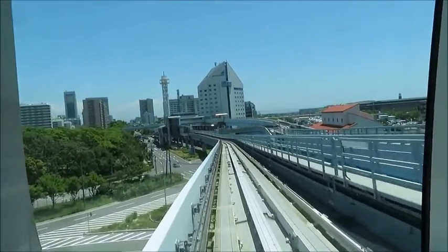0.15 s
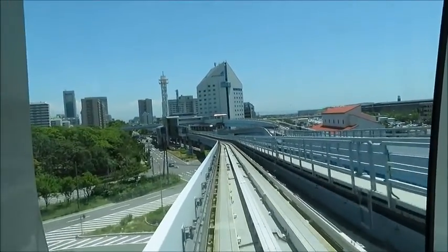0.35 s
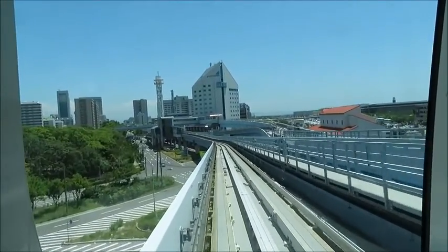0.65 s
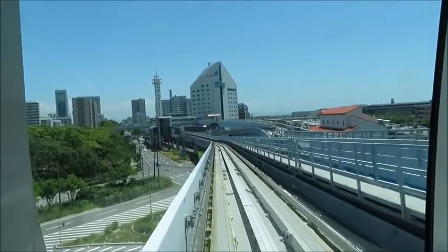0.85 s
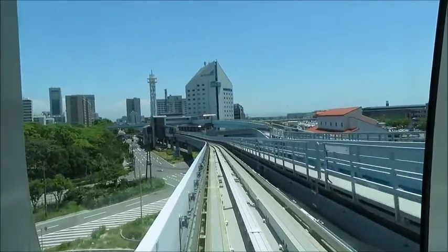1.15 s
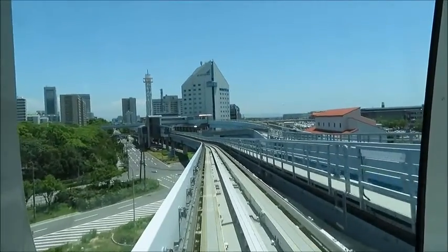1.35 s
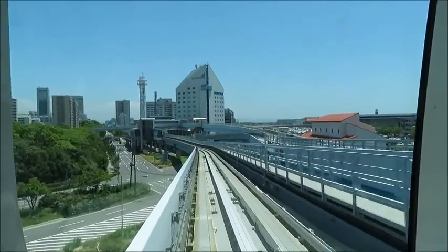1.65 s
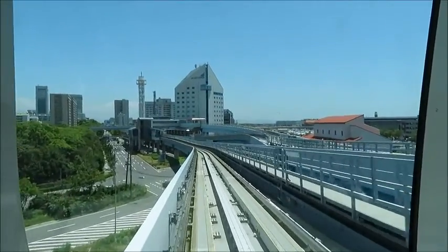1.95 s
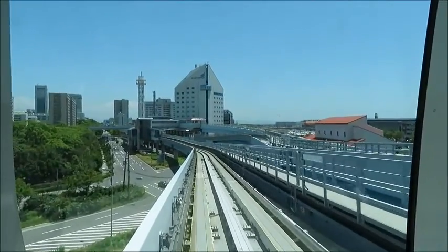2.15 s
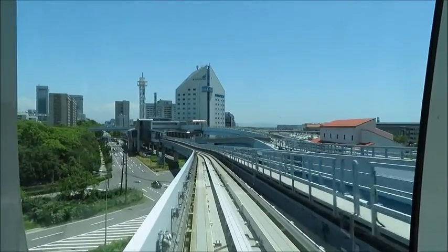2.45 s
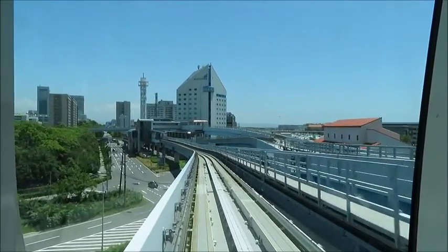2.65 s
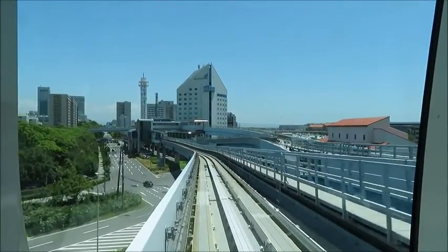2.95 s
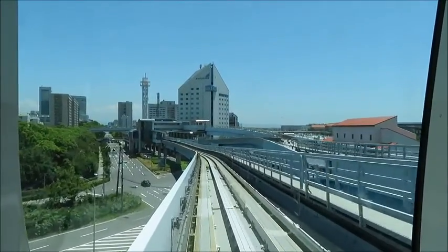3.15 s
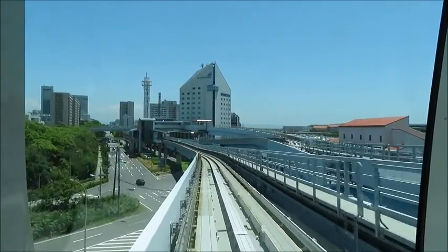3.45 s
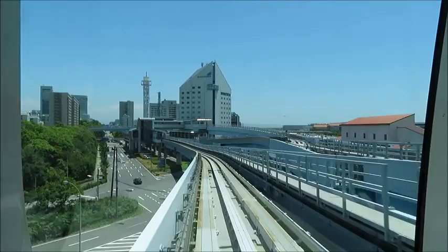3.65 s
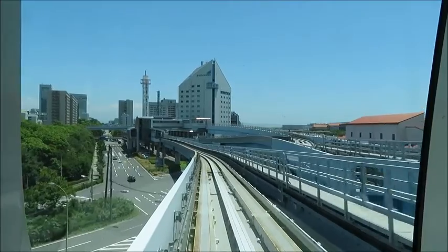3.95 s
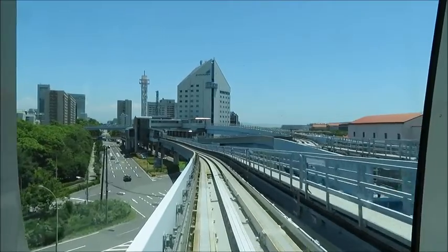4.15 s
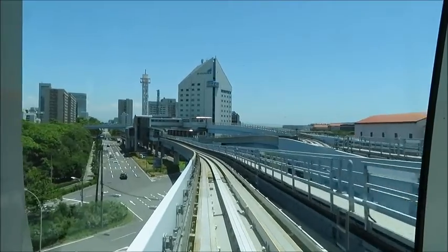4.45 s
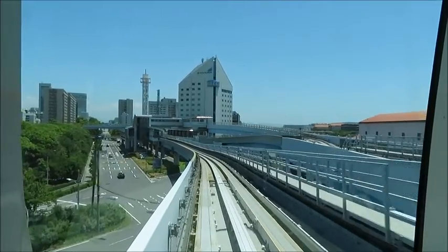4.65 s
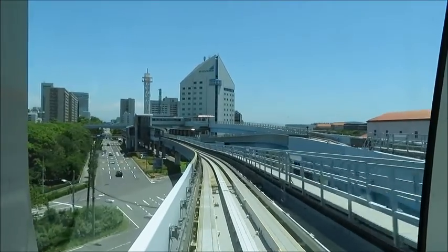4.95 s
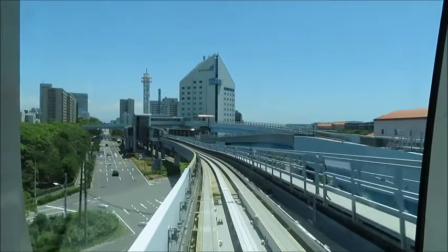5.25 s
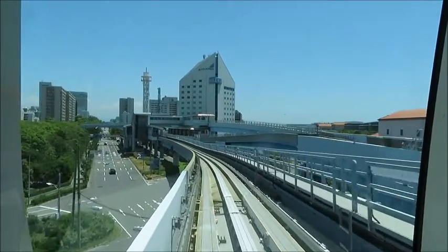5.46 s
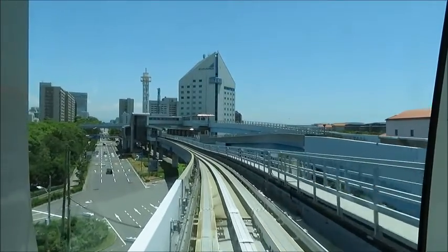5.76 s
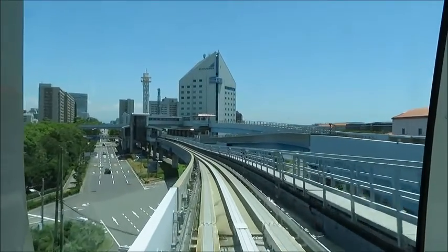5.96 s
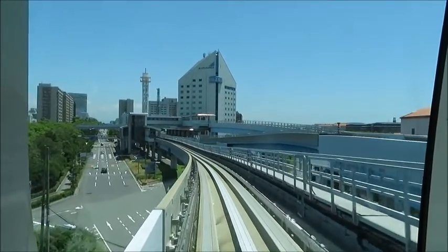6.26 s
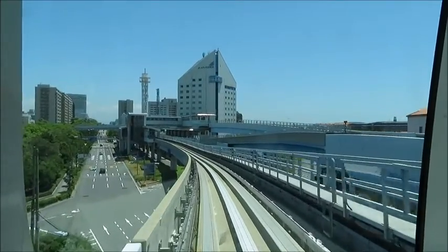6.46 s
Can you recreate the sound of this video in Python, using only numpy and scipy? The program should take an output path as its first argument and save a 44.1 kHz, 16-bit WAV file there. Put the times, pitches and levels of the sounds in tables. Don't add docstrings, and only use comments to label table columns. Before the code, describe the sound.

Inside a rubber-tyred train running on an elevated concrete guideway, a dark, continuous rolling roar fills the cabin. A low tread hum drops out and returns in quick bursts, rising very slightly in pitch. The floor booms over humps, deck joints thud softly, and a faint gear whine flickers. A small camera microphone inside hears everything nearly centred, close to mono.

```python
import sys
import numpy as np
from scipy import signal
from scipy.fft import rfft, irfft, next_fast_len
from scipy.io import wavfile
from scipy.ndimage import uniform_filter1d

SR = 44100
rng = np.random.default_rng(int(sys.argv[2]) if len(sys.argv) > 2 else 0)


def ratio(d):
    e = np.asarray(d, float) / 20
    return 10 ** e


def dump(signal):
    limited = np.clip(np.atleast_2d(signal).T, -1, 1)
    pcm = np.round(limited * 32767).astype(np.int16)
    wavfile.write(sys.argv[1], SR, pcm)


N = 291127
TIME = np.arange(N) / SR
COARSE = TIME[::64]


def curve(table):
    s, *columns = np.transpose(table)
    return [np.interp(TIME, s, column) for column in columns]


def on_log_axis(points, hz):
    at, db = np.transpose(points)
    return np.interp(np.log(hz), np.log(at), db)


def walk(rate):
    k = int(SR / rate)
    held = np.repeat(rng.standard_normal(N // k + 1), k)[:N]
    return 1.33 * uniform_filter1d(uniform_filter1d(held, k), k)


def tone(hz):
    return np.sqrt(2) * np.sin(2 * np.pi * np.cumsum(hz) / SR)


def hump(s, rise_s, fall_s):
    side_s = np.where(COARSE < s, rise_s, fall_s)
    return np.exp(-((COARSE - s) / side_s) ** 2)


def lifts(events, rise_s, fall_s):
    return np.interp(TIME, COARSE, sum(db * hump(s, rise_s, fall_s) for s, db in events))


def swells(events, rise_s, fall_s, rest_db):
    gain = ratio(rest_db) + sum(ratio(db) * hump(s, rise_s, fall_s) for s, db in events)
    return np.interp(TIME, COARSE, 20 * np.log10(gain))


def stretches(table, edge_s, rest_db):
    def edge(s):
        return 0.5 * np.tanh((COARSE - s) / edge_s)

    gain = ratio(rest_db) + sum(ratio(db) * (edge(s) - edge(s + length)) for s, length, db in table)
    return np.interp(TIME, COARSE, gain)


def draught():
    out = 0
    for hz in np.arange(11700, 15000, 400):
        band = signal.butter(2, [hz - 200, hz + 200], "band", fs=SR, output="sos")
        level_db = -82 + min(hz - 11700, 2400) / 1400 + 4.5 * walk(18)
        out = out + ratio(level_db) * signal.sosfilt(band, rng.standard_normal(N))
    return out


# (time [s], level [dB])
TRIM_TICKS = [(.19, -67), (.86, -71), (1.26, -72), (1.49, -69), (2.685, -60.5), (3.125, -65.5), (3.36, -71),
              (3.47, -72.5), (3.72, -69.5), (4.1, -72), (4.22, -65.5), (5.62, -68.5), (5.84, -66.5),
              (5.95, -68.5), (6.2, -71)]


def ticks():
    burst = sum(ratio(db) * np.exp(-((TIME - s) / 0.01) ** 2) for s, db in TRIM_TICKS)
    bright = signal.butter(2, 7000, "high", fs=SR, output="sos")
    return burst * signal.sosfilt(bright, rng.standard_normal(N))


# (start [s], length [s], level [dB], ring [Hz])
FRAME_KNOCKS = [(.49, .05, -38, 105), (.57, .05, -36, 100), (.66, .07, -34, 112), (.7, 0.036, -40, 195),
                (.98, 0.055, -37, 100), (1.19, .05, -35, 205), (1.28, 0.056, -33, 215),
                (1.6, .06, -36, 115), (1.75, .06, -38, 140), (1.98, .07, -36, 150), (5.45, .08, -36, 52),
                (5.65, .06, -38, 135), (2.3, .08, -34, 48), (2.47, .06, -33, 125), (3.286, 0.054, -35, 205),
                (4.19, .05, -35, 210), (4.47, 0.065, -36, 215), (4.6, 0.047, -36.5, 190),
                (5.28, .05, -38, 110), (5.6, .05, -39, 195), (5.8, .04, -39, 200), (6.08, .05, -39, 110),
                (1.455, 0.041, -30, 123), (2.132, 0.11, -34, 117), (2.386, 0.098, -32.5, 108.9),
                (2.593, .04, -31, 120), (2.9, 0.046, -29.5, 105), (3.146, 0.035, -30, 117.3),
                (3.34, 0.12, -34, 140.4), (3.485, 0.12, -29.5, 142), (3.788, .05, -31, 119.2),
                (4.107, 0.051, -31.5, 150.4), (4.24, 0.044, -31.5, 139.2), (5.419, .05, -35, 121),
                (5.825, 0.052, -33, 113.2), (6.25, 0.051, -31, 113), (6.377, 0.031, -37, 122.5)]


def knocks():
    wobble = 1 + 0.0402 * walk(30)
    out = 0
    for s, length, db, hz in FRAME_KNOCKS:
        out = out + stretches([(s, length, db)], edge_s=0.023, rest_db=-120) * tone(hz * wobble)
    return out


# (time [s], peak level [dB], floor ring [Hz], panel ring [Hz], panel minus floor [dB])
DECK_JOINTS = [(0.118, -17.5, 316, 551, -11), (0.479, -24.5, 345, 420, -7), (0.632, -30.5, 370, 570, 1),
               (1.291, -28, 373, 568, -13), (1.458, -24, 314, 467, 2), (1.80, -26.5, 336, 396, 3),
               (2.029, -23.5, 340, 483, -5.5), (2.217, -32, 340, 435, 9), (2.359, -34, 129, 150, -4),
               (2.9, -26.5, 109, 212, 0), (3.378, -31, 143, 160, -3), (3.5, -31, 142, 120, 1),
               (2.769, -25.5, 359, 434, -2), (3.252, -36, 387, 447, 12.5), (3.97, -28, 340, 570, 1.5),
               (4.59, -28, 407, 466, 4), (4.723, -34, 340, 440, 6), (5.601, -39, 414, 471, 13),
               (5.89, -31.5, 340, 383, 5)]


def joints():
    out = np.zeros(N + SR)
    t = np.arange(SR // 2) / SR
    t60_s = 0.13
    push = (1 - np.exp(-t / 0.0072)) * np.exp(-np.log(1000) * t / t60_s)
    frame = 0.51 * np.sin(2 * np.pi * 205 * t)
    for s, db, floor_hz, panel_hz, panel_db in DECK_JOINTS:
        floor = np.sin(2 * np.pi * floor_hz * t)
        panel = np.sin(2 * np.pi * panel_hz * t) + np.sin(2 * np.pi * 0.93 * panel_hz * t)
        ring = floor + 0.68 * ratio(panel_db) * panel + frame
        start = int(s * SR)
        out[start:start + len(t)] += ratio(db + 1.5) * push * ring
    return out[:N]


# (start [s], length [s], mesh tone level [dB])
GEAR_LOADS = [(.11, .08, -49), (.47, .09, -49), (.65, .2, -48), (1.065, 0.041, -49), (1.368, 0.054, -42),
              (1.464, 0.079, -43.5), (1.593, 0.16, -42), (1.791, 0.21, -37.5), (2.098, 0.092, -46),
              (2.226, 0.23, -47), (2.507, 0.12, -37), (2.805, 0.14, -43), (2.96, 0.23, -43),
              (3.228, 0.17, -42.5), (3.39, .2, -40), (3.659, 0.1, -41), (3.85, 0.13, -37.5),
              (4.04, 0.13, -40.5), (4.229, .04, -44), (4.385, 0.13, -41), (4.658, 0.18, -45.5),
              (4.96, 0.15, -47), (5.281, 0.22, -44.5), (5.55, 0.1, -48), (5.758, 0.19, -47.5),
              (6.1, 0.093, -45), (6.299, 0.12, -43.5), (6.456, 0.17, -48)]
# (time [s], level [dB])
GEAR_OCTAVE = [(0, -66), (.7, -57), (1.0, -66), (1.11, -51), (1.19, -62), (1.28, -54), (1.45, -51),
               (1.6, -49), (1.7, -51), (1.77, -45), (1.92, -44.5), (1.98, -51), (2.03, -59), (2.13, -56),
               (2.3, -57), (2.36, -66), (2.7, -75)]


def gears(mesh_hz):
    play = np.interp(mesh_hz, [918, 942], [0.1, 1])
    strands = 0
    for offset_hz in (-52, 52):
        strand_db = -18 + 10 * play + 3 * walk(12)
        strands = strands + ratio(strand_db) * tone(mesh_hz + offset_hz + 9 * walk(15))
    load = stretches(GEAR_LOADS, edge_s=0.032, rest_db=-55)
    flicker = ratio(-1 + (2 + 2 * play) * walk(35))
    mesh = tone(mesh_hz + (4.5 + 4 * play) * walk(30))
    octave_db = curve(GEAR_OCTAVE)[0] + 1 + 0.8 * walk(30)
    octave = ratio(octave_db) * tone(2 * mesh_hz + 2.5 * walk(20))
    inverter = ratio(-73 + 2 * walk(6)) * tone(2754 + 4 * walk(12))
    return load * flicker * (mesh + strands) + octave + inverter


# (time [s], level [dB])
DECK_HUMPS = [(0.257, -30.5), (0.59, -38), (0.771, -26.5), (0.989, -26.5), (1.281, -54), (1.522, -29),
              (1.791, -32.5), (1.984, -30.5), (2.306, -29), (2.431, -44), (2.603, -38), (2.917, -41),
              (3.218, -32.5), (3.471, -41), (3.777, -31.5), (3.929, -42.3), (4.176, -36), (4.54, -37),
              (5.008, -24), (5.213, -39), (5.65, -27.5), (5.935, -40), (6.107, -28), (6.541, -29.5)]
# (time [s], level [dB])
FLOOR_JOLTS = [(0.05, -21), (0.2, -29), (0.5, -37), (0.626, -30), (1.003, -32.5), (1.324, -29.5),
               (1.562, -44), (1.69, -31), (1.903, -36), (2.19, -37), (2.453, -39), (2.646, -41),
               (2.885, -31), (3.13, -27), (3.363, -44), (3.6, -30), (3.782, -45), (4.089, -29), (4.3, -31),
               (4.46, -30), (4.6, -31), (4.761, -29.5), (4.916, -33), (5.397, -21.5), (5.566, -27),
               (5.7, -35), (5.88, -26), (6.178, -30), (6.411, -26)]


def car_body():
    bounce_hz, floor_hz = 29.4, 76.3
    bounce_db = swells(DECK_HUMPS, rise_s=0.1, fall_s=0.048, rest_db=-37) + 1.1 * walk(22)
    floor_db = swells(FLOOR_JOLTS, rise_s=0.08, fall_s=0.13, rest_db=-33.5) + 0.93 * walk(24)
    bounce = tone(bounce_hz * (1 + 0.07 * walk(12)))
    bounce = bounce + 0.5 * tone(0.85 * bounce_hz * (1 + 0.28 * walk(9)))
    floor = tone(floor_hz * (1 + 0.0805 * walk(20)))
    floor = floor + 0.5 * tone(1.3 * floor_hz * (1 + 0.1025 * walk(25)))
    bounce = bounce * ratio(bounce_db + 0.66 + 0.9 * walk(26))
    return bounce + floor * ratio(floor_db - 7.5 + 1.4 * walk(30))


# (start [s], length [s], level [dB])
EVEN_DECK = [(0.008, 0.052, -32.5), (0.075, 0.11, -34), (0.223, 0.17, -34.5), (0.588, 0.15, -33.5),
             (0.68, 0.06, -35), (0.79, 0.13, -32.5), (0.87, 0.06, -38), (1.103, 0.15, -29),
             (1.49, 0.16, -33.5), (1.65, 0.2, -28), (1.929, 0.067, -26.5), (2.062, 0.054, -32.5),
             (2.15, 0.26, -36.5), (2.43, 0.044, -35.5), (2.53, 0.08, -41), (2.63, 0.15, -35),
             (2.81, 0.15, -31.5), (2.965, 0.32, -38.5), (3.04, 0.1, -39), (3.33, 0.044, -36.5),
             (3.456, 0.21, -36), (3.671, 0.11, -29.5), (3.8, 0.2, -38), (4.02, 0.055, -40),
             (4.268, 0.1, -36), (4.28, 0.04, -37), (4.43, 0.08, -30), (4.542, 0.084, -32.5),
             (4.795, 0.37, -37), (5.02, 0.086, -41), (5.2, 0.14, -47), (5.403, 0.065, -27),
             (5.522, 0.15, -30), (5.82, 0.06, -41), (5.97, 0.056, -34), (6.084, 0.027, -26),
             (6.153, 0.14, -37), (6.374, 0.025, -27), (6.526, 0.069, -30.5)]


def tread_hum(hz):
    level = stretches(EVEN_DECK, edge_s=0.032, rest_db=-48.5) * ratio(1.4 * walk(30))
    hz = hz + 1.6 * walk(18)
    return level * (tone(hz) + ratio(-20.5) * tone(2 * hz))


# (time [s], roar level [dB])
COARSENESS = [(0, -46), (.73, -47.5), (1.47, -43), (2.2, -44.5), (2.57, -42), (2.63, -45), (2.93, -43),
              (3.67, -44.5), (3.76, -44.5), (4.05, -43.5), (4.4, -44), (4.97, -45.5), (5.02, -47),
              (5.13, -45.5), (5.87, -46), (6, -45), (6.6, -40)]
# (time [s], lift [dB])
ROUGH_STRIPS = [(0.217, 2), (0.358, 0.8), (0.545, 1.5), (0.686, 4), (0.883, 3), (1.192, 2.5), (1.397, 3),
                (1.677, 4.5), (1.927, 4), (2.207, 3.5), (2.507, 1.5), (3.145, 1.5), (3.435, 3.5),
                (3.683, 3), (4.119, 1.5), (4.482, 2), (4.679, 3.5), (4.922, 3.5), (5.138, 1.5),
                (5.324, 1.5), (5.433, 2), (5.6, 3), (5.865, 2)]
# (time [s], lift [dB])
SEAM_PUFFS = [(.2, 1.5), (.54, 2), (1.12, 1.5), (1.38, 1.5), (1.62, 2.5), (1.88, -1.5), (2.5, 2.5),
              (2.58, 1.5), (3.14, 2.5), (3.4, 1), (3.56, 1.5), (3.72, 1), (4.15, 0.5), (4.5, 0.5),
              (5.44, 0.5), (5.86, 2), (6.5, 1.5)]
# (time [s], level [dB])
ROUGH_PATCHES = [(0.122, -49.5), (0.522, -48), (0.697, -52.5), (1.296, -39), (1.503, -43), (1.981, -39),
                 (2.195, -38), (2.454, -38), (2.629, -37), (3.402, -31.5), (3.571, -41), (3.856, -38),
                 (4.139, -35.5), (4.258, -45), (4.469, -38), (4.726, -35), (5.113, -51), (5.468, -45),
                 (5.897, -35.5), (6.212, -51.5), (6.396, -40), (6.635, -36.5)]


def rolling():
    roar = curve(COARSENESS)[0] + 5 + lifts(ROUGH_STRIPS, rise_s=0.18, fall_s=0.059)
    rumble = swells(ROUGH_PATCHES, rise_s=0.092, fall_s=0.063, rest_db=-37)
    mean = roar.mean()
    change = roar - mean
    drone = mean - 4 + 0.63 * change + 0.44 * (rumble - rumble.mean()) + 1.2 * walk(14)
    puffs = lifts(SEAM_PUFFS, rise_s=0.036, fall_s=0.036)
    hiss = mean - 21 + 0.8 * change + puffs + 0.55 * walk(25.02)
    return rumble + 0.34 * walk(23), drone, roar, hiss


# (frequency [Hz], level [dB per Hz])
TYRE_COLOUR = [(11, -5), (19, -2), (27, -8), (40, -5), (84, -6), (217, -13.5), (265, -16), (320, -13),
               (519, -19), (1040, -26.5), (2090, -34.5), (3000, -39), (6000, -50.5), (11000, -64),
               (14300, -72), (15050, -74), (15200, -95)]
# (frequency [Hz], width [Hz],
# lift [dB])
RESONANCES = [
    (224, 30, 3.5),
    (340, 32, 3),
    (568, 10, 3),
    (843, 245, 5.5),
    (908, 65, 2.5),
    (1280, 250, 3),
    (1380, 90, 2),
    (2680, 300, 2),
]
# (frequency [Hz], side minus mid [dB])
PORT_DIFFERENCE = [(60, -60.5), (130, -54), (300, -35.5), (700, -29), (1300, -21), (2400, -15.5),
                   (4400, -8.5), (8000, -1.5), (12000, 2.5), (14600, 9), (15300, 9)]


def tyres():
    size = next_fast_len(N)
    hz = np.arange(1, size // 2 + 2) * SR / size
    db = on_log_axis(TYRE_COLOUR, hz)
    for centre_hz, width_hz, lift_db in RESONANCES:
        db = db + lift_db / (1 + (2 * (hz - centre_hz) / width_hz) ** 2)
    mid = rfft(rng.standard_normal(size)) * ratio(db)
    side = rfft(rng.standard_normal(size)) * ratio(db + on_log_axis(PORT_DIFFERENCE, hz))
    power = np.abs(mid) ** 2
    edges_hz = [(120, 270), (320, 650), (650, 2500), (3000, 12000)]
    gains_db = []
    for level_db, (low, high) in zip(rolling(), edges_hz):
        present = 2 * power[(hz > low) & (hz < high)].sum() / size ** 2
        gains_db.append(level_db - 10 * np.log10(present))
    patches, out = walk(9), np.zeros((2, N))
    for octave in np.arange(4, 14.1, 0.5):
        mask = np.cos(np.pi * np.clip(np.log2(hz) - octave, -0.5, 0.5)) ** 2
        place = np.interp(octave, [7.7, 8.4, 9, 9.8, 10.8, 12], [0, 1, 1, 2, 2, 3])
        shares = np.clip(1 - np.abs(place - np.arange(4)), 0, 1)
        band_db = sum(share * gain for share, gain in zip(shares, gains_db))
        band_db = band_db + 0.18 * patches + 0.62 * walk(12)
        one_port_db = np.clip(2.6 * (11.6 - octave), 1, 8) * walk(25)
        noise = irfft(mask * np.array([mid, side]), size)[:, :N]
        out = out + ratio([band_db, band_db + one_port_db]) * noise
    return out


# (time [s], tread hum [Hz], gear mesh [Hz])
TRAIN_SPEED = [
    (0, 286.4, 903),
    (1.1, 287.7, 915),
    (1.9, 289.2, 920),
    (2.3, 290.6, 921.5),
    (2.7, 292, 928),
    (3.5, 294.5, 935),
    (4.3, 295.3, 940),
    (6.6, 296.3, 943),
]


def scene():
    hum_hz, mesh_hz = curve(TRAIN_SPEED)
    mid, side = tyres()
    mid = mid + tread_hum(hum_hz) + gears(mesh_hz) + car_body() + joints() + knocks() + draught()
    rustle = ticks()
    mid = mid + ratio(-12) * rustle
    low_mids = signal.sosfilt(signal.butter(2, [190, 480], "band", fs=SR, output="sos"), mid)
    side = side + 1.1 * np.gradient(low_mids) + ratio(-3) * rustle
    return np.array([mid + side, mid - side])


def roll_off(x):
    return signal.sosfilt(signal.butter(12, 15470, fs=SR, output="sos"), x)


def record(dry):
    from_end_s = np.minimum(TIME, TIME[-1] - TIME)
    ends = np.sin(np.pi / 2 * np.clip(from_end_s / 0.006, 0, 1)) ** 2
    return roll_off(dry * ends)


dry = scene()
out = record(dry)
dump(out)
```